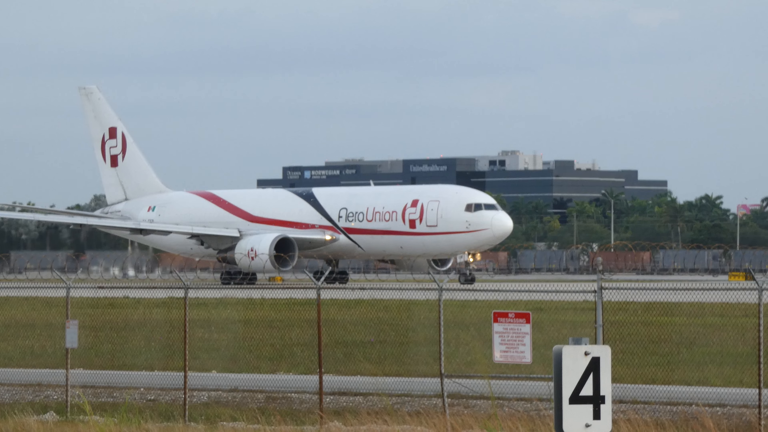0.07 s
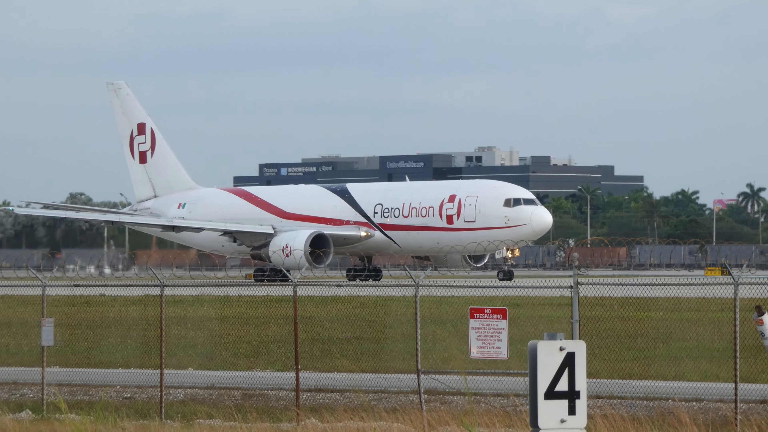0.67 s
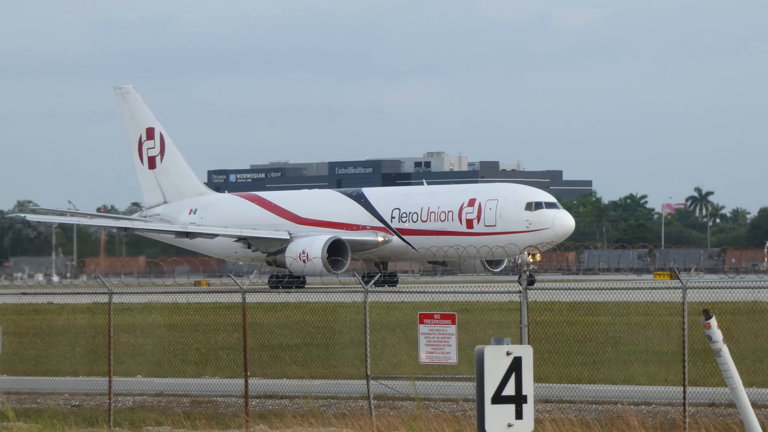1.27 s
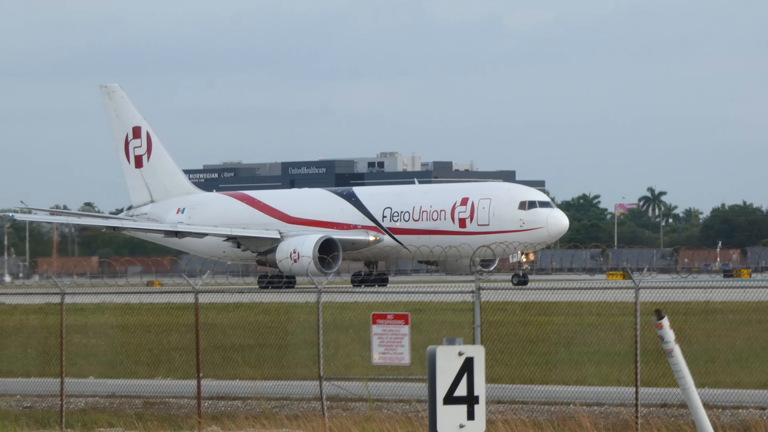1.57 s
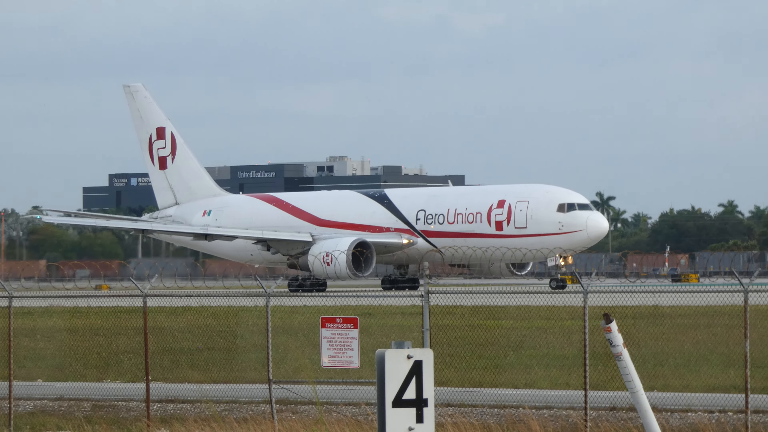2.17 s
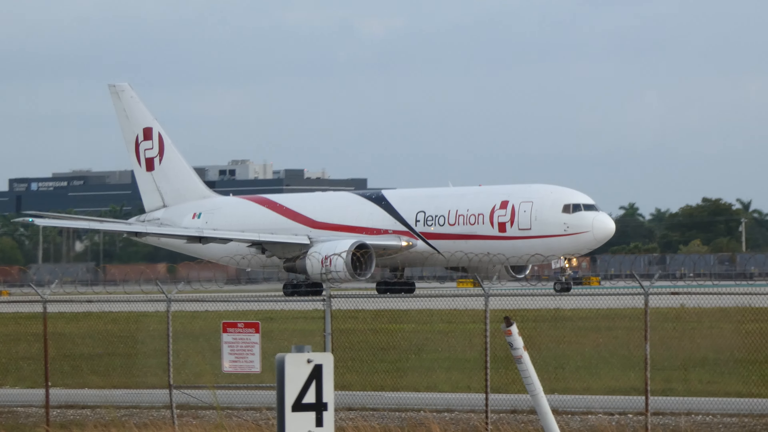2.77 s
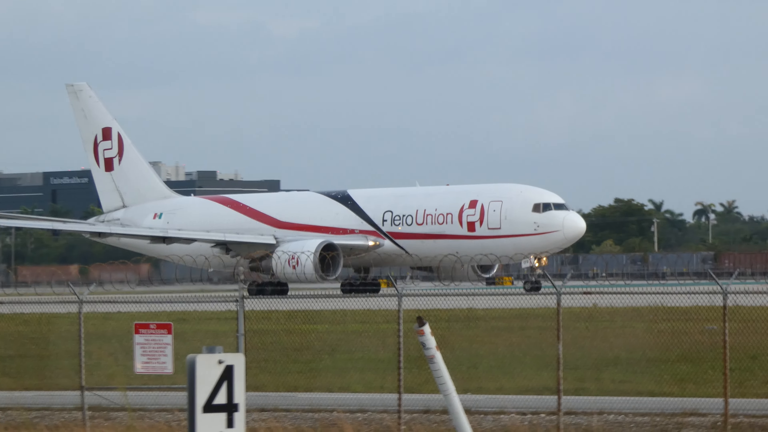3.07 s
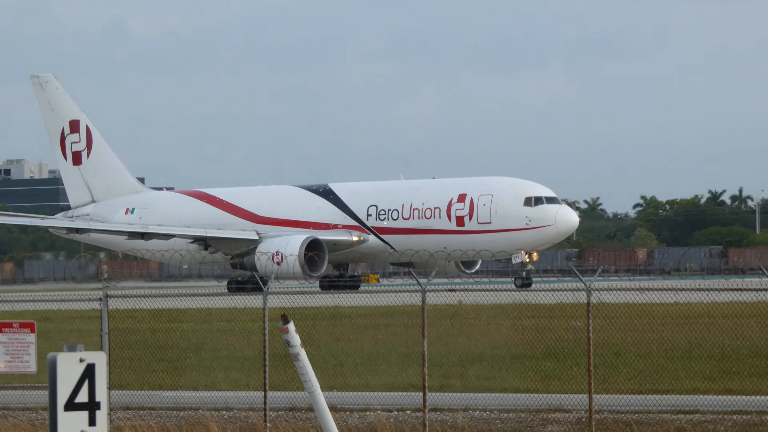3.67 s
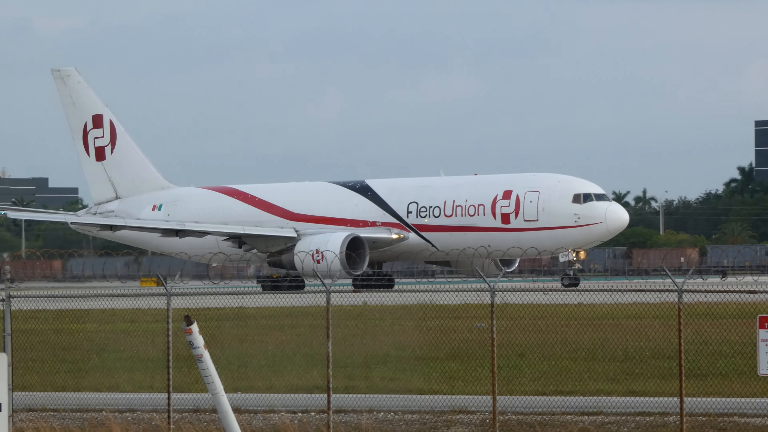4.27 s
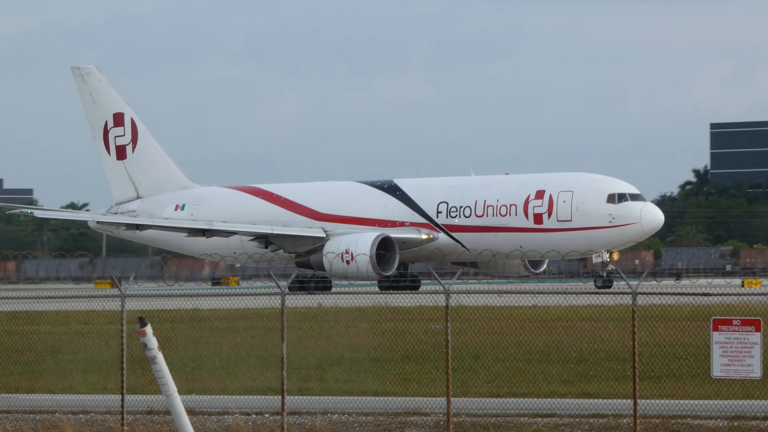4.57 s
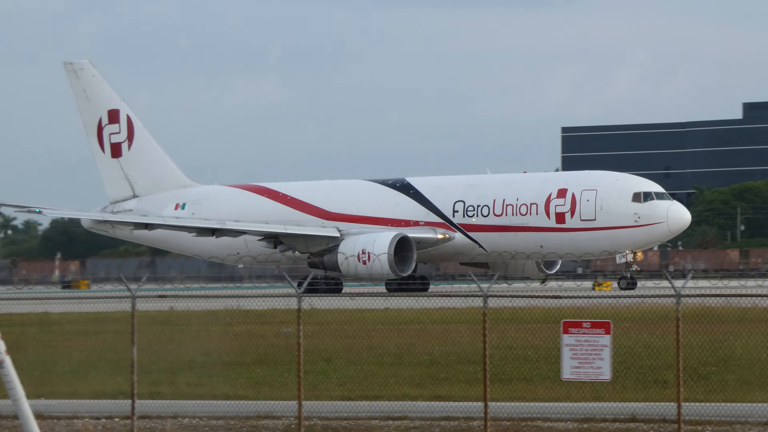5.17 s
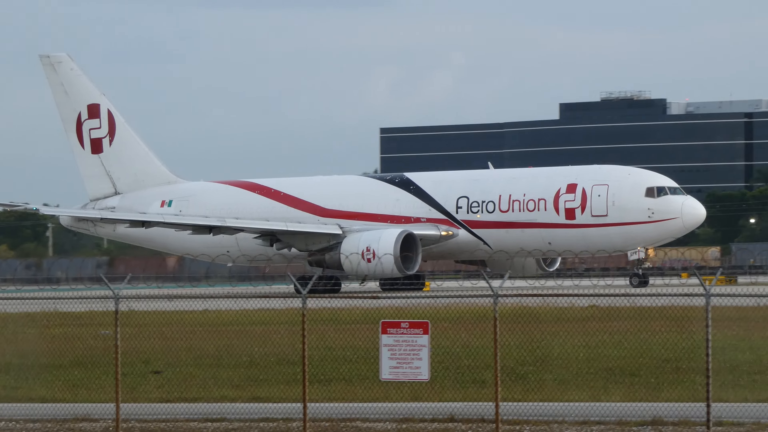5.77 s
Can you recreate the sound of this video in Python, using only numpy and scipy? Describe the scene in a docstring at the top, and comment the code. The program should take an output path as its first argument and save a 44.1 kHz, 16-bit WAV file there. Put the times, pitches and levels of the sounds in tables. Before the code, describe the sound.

Outdoors, some distance from a runway, an airliner's two jet engines spool up with a piercing, rising whine and a broad rush of air. The pitch gradually settles at full power while a rough buzz comes in and a deep rumble builds underneath. The engine tones beat against each other, swelling and fading as they carry over the field, with a faint high whistle above.

```python
"""A rising fan whine over rushing air: a twin-engined jet airliner spools up and starts its take-off roll,
a few hundred metres away across an airfield. The two fans whine at blade rate and beat against each other.
Exhaust roar and rumble grow under the rush of the intakes and a faint turbine whistle. As the blade tips
go supersonic a buzz of shaft harmonics joins in. The moving air makes everything waver."""
import sys
import numpy as np
from scipy import signal
from scipy.fft import rfft, irfft
from scipy.io import wavfile
from scipy.ndimage import map_coordinates

SR = 44100
rng = np.random.default_rng(int(sys.argv[2]) if len(sys.argv) > 2 else 0)


def store_wav(level_fs):
    """Save 16-bit WAV to argv[1]."""
    pcm = np.round(np.clip(np.atleast_2d(level_fs), -1, 1) * 32767)
    wavfile.write(sys.argv[1], SR, pcm.T.astype(np.int16))


N = 265923
TIME_S = np.arange(N) / SR
FREQ_HZ = np.fft.rfftfreq(N, 1 / SR)
BLADES, FULL_SHAFT_HZ = 38, 52.47


def undb(db):
    """Decibels to gain."""
    return 10 ** (np.asarray(db) / 20)


def curves(table):
    """Columns of a timed table, one value a sample."""
    time_s, *columns = np.transpose(table)
    return [np.interp(TIME_S, time_s, column) for column in columns]


def at_pitch(table, hz):
    """Interpolate a spectrum on a log frequency axis."""
    freq_hz, level_db = np.transpose(table)
    return np.interp(np.log(np.maximum(hz, 1)), np.log(freq_hz), level_db)


def walk(rate_hz):
    """Smooth random drift of unit spread."""
    drift = signal.resample_poly(rng.standard_normal(2048), 8, 1)
    return np.interp(TIME_S * rate_hz * 8, np.arange(len(drift)), drift)


def tone(cycles, waver_db, waver_hz, smear_rad):
    """Sine of rms near one; eddies on its path shake level and phase."""
    phase = 2 * np.pi * (cycles + rng.random()) + smear_rad * walk(waver_hz)
    return np.sqrt(2) * np.sin(phase) * undb(waver_db * walk(waver_hz))


def turbulence(spectrum, flicker_db, flicker_hz):
    """Coloured noise of unit rms whose octaves flicker separately."""
    coloured = rfft(rng.standard_normal(N)) * undb(at_pitch(spectrum, FREQ_HZ))
    octave = np.log2(np.clip(FREQ_HZ, spectrum[0][0], spectrum[-1][0]))
    out = 0
    for centre in range(int(octave[0]), int(octave[-1]) + 2):
        band = irfft(coloured * np.maximum(1 - np.abs(octave - centre), 0), N)
        out = out + band * undb(flicker_db * walk(flicker_hz))
    return out / np.sqrt(np.mean(out ** 2))


def shaft_hz():
    """Spool-up: a steady climb hands over softly to an exponential settling on take-off speed."""
    climb_hz = 39.9 + 9.05 * TIME_S
    settle_hz = FULL_SHAFT_HZ - 8.04 * np.exp(-TIME_S / 1.31)
    handover_hz = 0.745
    return -handover_hz * np.logaddexp(-climb_hz / handover_hz, -settle_hz / handover_hz)


# Treble swell in moving air: time_s, level_db
TREBLE_SWELL = [(0.06, 2), (0.17, -0.5), (0.33, 0.5), (0.68, 2), (1.0, 3.5), (1.17, 3), (1.62, 4.5),
                (1.8, 4), (1.93, 2.5), (2.29, 4.5), (2.39, 2.6), (2.6, 2.5), (2.82, 2.5), (3.17, -1),
                (3.4, 0.7), (3.62, 1), (3.79, -0.5), (3.99, 1.9), (4.2, 1.6), (4.5, 3), (4.65, 0.5),
                (4.82, 3), (5.0, 1), (5.18, 3.5), (5.33, 3.5), (5.5, 2.6), (5.65, 2), (5.88, 1.5),
                (6.03, 2.5)]
# Level laws by layer: full_speed_db, db_per_shaft_hz, db_per_s, swell_share
LEVEL_LAWS = { "roar": (-32.5, 0.9, 1.1, 0.17), "rush": (-24.5, 1.1, -1.21, 0.86),
              "rasp": (-39.5, 1.3, 0.54, 1.32), "hiss": (-33, 0.37, -0.06, 1.51),
              "whistle": (-54.5, -0.25, -0.57, 3), "third": (-48.5, 0.15, -1.4, 1.5),
              "fourth": (-67, -1.0, -0.5, 1.5), }

def layer_gain(layer):
    """Gain from fan speed, progress along the runway and treble swell."""
    full_speed_db, db_per_shaft_hz, db_per_s, swell_share = LEVEL_LAWS[layer]
    speed_db = full_speed_db + db_per_shaft_hz * (shaft_hz() - FULL_SHAFT_HZ)
    return undb(speed_db + db_per_s * TIME_S + swell_share * curves(TREBLE_SWELL)[0])


# Intake beam lobes: centre_s, shaft_order, half_width_s, peak_db
BEAM_LOBES = [(.48, 152, .2, -50), (.65, 114, .2, -44), (1.02, 114, .1, -43), (1.14, 34, .12, -29),
              (1.15, 35, .15, -27.5), (1.2, 36, .2, -32), (1.25, 85, .15, -46), (1.32, 114, .1, -45),
              (1.45, 47, .3, -39.5), (1.52, 35, .14, -33), (1.55, 34, .16, -32), (1.97, 29, .18, -26.5),
              (2.2, 47, .15, -38), (2.68, 34, .14, -33), (2.8, 47, .15, -39), (2.8, 54, .15, -41),
              (4.3, 47, .2, -40), (4.42, 29, .13, -34), (5.2, 29, .2, -33), (5.25, 47, .3, -39),
              (5.4, 41, .2, -37), (5.3, 54, .2, -40), (5.42, 55, .18, -39.5), (5.35, 52, .3, -39.5)]

def flare(order):
    """Gain of one shaft harmonic as lobes of the intake's beam sweep past the listener."""
    return sum(undb(peak_db) * np.exp(-((TIME_S - centre_s) / half_width_s) ** 2)
               for centre_s, shaft_order, half_width_s, peak_db in BEAM_LOBES if shaft_order == order)


def shock_flutter():
    """Rough gain on the blade tone while the first shocks come and go at the tips."""
    depth = 0.18 * np.exp(-((TIME_S - 1.25) / 0.25) ** 2)
    return (1 + depth * walk(rate_hz=260)) / np.sqrt(1 + depth ** 2)


# Blade tone as it carries over the field: time_s, level_db
BLADE_LEVEL = [(0.06, -26), (0.2, -23.5), (0.29, -18.5), (0.335, -18), (0.355, -24), (0.375, -19),
               (0.5, -17), (0.585, -26), (0.64, -16.5), (0.7, -22.5), (0.79, -22.5), (0.9, -20.5),
               (1.08, -25), (1.3, -23), (1.52, -33.5), (1.84, -26.5), (2.02, -31), (2.2, -24), (2.38, -31),
               (2.62, -23), (2.73, -32), (2.87, -25), (3.13, -24.5), (3.25, -34.5), (3.44, -29),
               (3.55, -38.5), (3.65, -28.5), (3.78, -26.5), (3.88, -31.5), (4.2, -34), (4.36, -34),
               (4.49, -23), (4.56, -33.5), (4.63, -27), (4.76, -29), (4.88, -28.5), (5.15, -31.5),
               (5.35, -34.5), (5.64, -24.5), (5.81, -30), (5.89, -26.5), (6.03, -28.5)]
# Its octave: time_s, level_db
OCTAVE_LEVEL = [(0.06, -45.5), (0.2, -49), (0.42, -37.5), (0.58, -44), (0.67, -40), (0.77, -46),
                (0.87, -33.5), (0.95, -38), (1.21, -30.5), (1.36, -38.5), (1.7, -40.5), (1.87, -35),
                (2.02, -40.5), (2.13, -35), (2.25, -42.5), (2.4, -37.5), (2.52, -54.5), (2.9, -39),
                (3.15, -48.5), (3.3, -43), (3.7, -46), (4.1, -40), (4.25, -36.5), (4.36, -47), (4.7, -45),
                (5.08, -39.5), (5.38, -45.5), (5.53, -36.5), (5.65, -50), (6.03, -47)]
# Higher overtones: layer, blade_multiple, waver_db, waver_hz, smear_rad
BLADE_OVERTONES = [("third", 3, 3.5, 85, 1.3), ("fourth", 4, 2.8, 80, 1.3)]

def fan_whine(turns):
    """Blade-passing tone of one fan; its overtones scatter more in the air and fade in and out."""
    passes = BLADES * turns + 0.064 * walk(rate_hz=9.8)  # slow eddies vary the path length
    fundamental = tone(passes, waver_db=1.3, waver_hz=70, smear_rad=0.3) * shock_flutter()
    octave = tone(2 * passes, waver_db=2.6, waver_hz=70, smear_rad=0.8)
    out = undb(curves(BLADE_LEVEL)[0] + 0.66) * fundamental
    out += undb(curves(OCTAVE_LEVEL)[0] + 0.5) * octave
    for layer, multiple, waver_db, waver_hz, smear_rad in BLADE_OVERTONES:
        gain = np.hypot(layer_gain(layer), flare(multiple * BLADES))
        out += gain * tone(multiple * passes, waver_db, waver_hz, smear_rad)
    return out


# Spectral dips: centre_hz, half_width_hz, gain_db
DIPS = [(864, 43, 0.5), (2446, 100, -3), (3280, 170, -4.5), (4600, 81, -7)]

def hollow(x):
    """Steady dips give the airflow a hollow, ringing colour."""
    shape_db = sum(gain_db * np.exp(-((FREQ_HZ - centre_hz) / half_width_hz) ** 2)
                   for centre_hz, half_width_hz, gain_db in DIPS)
    return irfft(rfft(x) * undb(shape_db), N)


def follow_shaft(x, share):
    """Raise the pitch of a noise by a share of the fan's rise in speed."""
    pace = (shaft_hz() / FULL_SHAFT_HZ) ** share
    return map_coordinates(x, [np.cumsum(pace)], mode="mirror")


# Intake spectra at full speed: freq_hz, density_db
RUSH_SPECTRUM = [(200, -56), (500, -14), (840, -24), (980, -9.5), (1250, -2.5), (1600, 1.5), (1850, -5),
                 (2150, -5), (2500, -11.5), (3400, -22), (5000, -53), (10000, -80)]
RASP_SPECTRUM = [(600, -59), (1900, -7), (2250, 3), (2500, 3.5), (2750, 2), (2950, 2.5), (3250, -2.5),
                 (4000, -41), (10000, -70.5)]
HISS_SPECTRUM = [(300, -43), (1500, 10), (2500, -1.5), (3300, 3.5), (3800, -1), (4250, 3), (4520, -1.5),
                 (4800, -2), (5800, -2), (7000, -6), (8100, -13.5), (9500, -18.5), (11000, -31),
                 (12300, -54)]

def intake():
    """Air drawn through the fans: rush and rasp climb with the shaft, hiss holds its pitch."""
    rush = follow_shaft(turbulence(RUSH_SPECTRUM, flicker_db=1.0, flicker_hz=19), share=0.25)
    rasp = follow_shaft(turbulence(RASP_SPECTRUM, flicker_db=1.5, flicker_hz=26), share=0.5)
    hiss = turbulence(HISS_SPECTRUM, flicker_db=0.57, flicker_hz=20)
    return hollow(layer_gain("rush") * rush + layer_gain("rasp") * rasp + layer_gain("hiss") * hiss)


# Turbine band: freq_hz, density_db
WHISTLE_SPECTRUM = [(4500, -39), (4700, -6), (4790, 0), (4890, -4), (5100, -40)]

def turbine_whistle():
    """Faint narrow-band whistle of a turbine stage, steady in pitch."""
    return layer_gain("whistle") * turbulence(WHISTLE_SPECTRUM, flicker_db=2.5, flicker_hz=9)


# Exhaust spectra: freq_hz, density_db
RUMBLE_SPECTRUM = [(20, -61), (30, -44), (50, -14.5), (75, -5.5), (102, 0), (135, -5), (180, -13),
                   (250, -22), (500, -61.5)]
ROAR_SPECTRUM = [(50, -50.5), (150, -24.5), (260, -17.5), (390, -13.5), (500, -9.5), (630, -1.5), (820, -4),
                 (1050, 1.5), (1600, -16), (3000, -52.5), (8000, -68)]
# Rumble growth: time_s, level_db
RUMBLE_LEVEL = [(0.4, -55), (1.0, -46.5), (2.6, -42.5), (3.7, -40), (4.75, -39.5), (5.1, -39.5),
                (6.03, -41)]

def exhaust():
    """The turbulent jets rumble and roar, louder as the engines spool up."""
    rumble = turbulence(RUMBLE_SPECTRUM, flicker_db=1.86, flicker_hz=7.5)
    roar = turbulence(ROAR_SPECTRUM, flicker_db=1.5, flicker_hz=8.6)
    return undb(curves(RUMBLE_LEVEL)[0] + 2.1) * rumble + hollow(layer_gain("roar") * roar)


# Chief shaft harmonics: shaft_order, level_db
CHIEF_HARMONICS = [(9, -42.5), (11, -45.5), (12, -44), (15, -44), (17, -40), (18, -38.5), (19, -36.5),
                   (20, -36), (22, -35.5), (23, -38), (25, -41.5), (26, -38), (27, -38), (29, -39.5),
                   (34, -40.5), (40, -39.5), (41, -39), (47, -41.5), (52, -47), (54, -46), (55, -48)]
# Envelope of the other harmonics: full_speed_pitch_hz, level_db
OTHER_HARMONICS = [(400, -56), (800, -46), (1300, -45), (1600, -43), (1850, -42.5), (1950, -50),
                   (2200, -44.5), (2550, -50.5), (2850, -48.5), (3300, -57), (3900, -53), (4500, -58),
                   (5200, -60)]
# Buzz onset, low orders last: shaft_order, trim_db, half_gain_shortfall_hz
BUZZ_ONSET = [(9, -2.1, 1.16), (19, -3, 2.8), (34.2, -0.25, 4.7)]

def shock_buzz(turns, orders, waver_db, waver_hz):
    """Supersonic tips carry unequal shocks, so shaft harmonics sound; eddies blur the high ones most."""
    chief_db = dict(CHIEF_HARMONICS)
    shortfall_hz = FULL_SHAFT_HZ - shaft_hz()
    onset_orders, trim_db, half_gain_hz = np.transpose(BUZZ_ONSET)
    out = np.zeros(N)
    for order in orders:
        level_db = chief_db.get(order, at_pitch(OTHER_HARMONICS, order * FULL_SHAFT_HZ))
        level_db += np.interp(order, onset_orders, trim_db)
        growth = 1 / (1 + (shortfall_hz / np.interp(order, onset_orders, half_gain_hz)) ** 2)
        gain = np.hypot(undb(level_db) * growth, flare(order))
        out += gain * tone(order * turns, waver_db, waver_hz, smear_rad=0.28 * order / BLADES)
    return out


# Near fan hunting around take-off speed: time_s, shaft_offset_hz
NEAR_FAN = [(3.4, 0), (4.2, -.07), (4.6, .07), (5.0, .09), (5.4, -.07), (6.03, 0)]
# Far fan relative to the near one: time_s, slip_hz, level_db
FAR_FAN = [(0.06, 1.0, -13), (0.3, 0.7, -17), (0.47, 0.55, -16), (0.6, -0.1, -8), (0.75, -0.5, -4.5),
           (0.88, -0.76, -2.5), (1.05, -0.82, -1), (1.22, -0.77, -3), (1.5, -0.8, -8), (2, -0.4, -9),
           (3.1, -0.12, -13), (4, 0.2, -11), (4.7, 0.24, -8), (5, -0.38, -5), (5.5, -0.15, -8),
           (6.03, 0.3, -8)]

def twin_fans():
    """Whine and buzz of two fans that beat at nearly equal speed; the fuselage partly hides the far one."""
    slip_hz, far_db = curves(FAR_FAN)
    near_turns = np.cumsum(shaft_hz() + curves(NEAR_FAN)[0]) / SR
    far_turns = near_turns + np.cumsum(slip_hz) / SR
    far_gain = undb(far_db)
    whine = (fan_whine(near_turns) + far_gain * fan_whine(far_turns)) / np.sqrt(1 + far_gain ** 2)
    near_orders = [order for order in range(8, 100) if order % BLADES]
    far_orders = [order for order, _ in CHIEF_HARMONICS]
    near_buzz = shock_buzz(near_turns, near_orders, waver_db=2.7, waver_hz=5)
    far_buzz = shock_buzz(far_turns, far_orders, waver_db=3, waver_hz=4)
    far_onset = np.interp(shaft_hz(), [50.5, FULL_SHAFT_HZ], [0, 1])
    return whine, near_buzz + far_onset * undb(far_db - 1.5) * far_buzz


# Top range, carried in soft gusts: time_s, gain_db
TOP_GAIN = [(0.06, -6), (0.65, -2.5), (0.95, 1), (1.25, -3.5), (1.62, -2.5), (2.2, -1.7), (2.7, -4.5),
            (3.3, -1.5), (3.55, 1.5), (4.4, 0.2), (4.9, -1.5), (5.2, 0.7), (6.03, -0.5)]

def air_absorption(x, edge_hz):
    """Air swallows the top range unevenly, and less as the aircraft nears."""
    highpass = 1 - 1 / (1 + (FREQ_HZ / edge_hz) ** 8)
    treble = irfft(rfft(x) * highpass, N)
    return x + treble * (undb(curves(TOP_GAIN)[0]) - 1)


# Stereo balance: freq_hz, left_minus_right_db
BALANCE = [(60, -2.5), (125, -1), (280, 2), (600, 1.7), (1100, 0.5), (1700, -3), (2200, 1.5), (4000, 0.5),
           (8000, 0)]
# Diffuse side share: freq_hz, level_db
SIDE_SHARE = [(30, -8.5), (70, -19), (250, -10), (600, -15.5), (1500, -16), (2500, -13), (5000, -13.5),
              (9000, -11.5)]

def stereo_scatter(x, decay_s):
    """Direct sound reaches both sides together; scatter from ground and buildings differs between them."""
    lag_s = TIME_S[:SR // 4]
    scatter = rfft(rng.standard_normal(len(lag_s)) * np.exp(-lag_s / decay_s), N)
    direct = rfft(x)
    side = direct * np.exp(1j * np.angle(scatter)) * undb(at_pitch(SIDE_SHARE, FREQ_HZ))
    lean = undb(at_pitch(BALANCE, FREQ_HZ) / 2)
    return np.array([irfft(direct * lean + side, N), irfft(direct / lean - side, N)])


def scene():
    """The aircraft heard through gusty air, which shakes the upper range most."""
    whine, buzz = twin_fans()
    jets = exhaust()
    upper = buzz + intake() + turbine_whistle()
    shimmer = undb(0.63 * walk(rate_hz=17))
    aircraft = whine + jets + upper * shimmer
    return stereo_scatter(air_absorption(aircraft, edge_hz=6400), decay_s=0.041)


def record(dry):
    """The sound opens quickly and a little loud, then settles; the top is cut."""
    start_s, rise_s, boost_db, settle_s, cutoff_hz = 0.054, 0.018, 9.5, 0.23, 11900
    age_s = np.maximum(TIME_S - start_s, 0)
    opening = np.minimum(age_s / rise_s, 1) * undb(boost_db * np.exp(-age_s / settle_s))
    lowpass = signal.ellip(8, 0.2, 70, cutoff_hz, fs=SR, output="sos")
    return signal.sosfilt(lowpass, dry * opening)


dry = scene()
out = record(dry)
store_wav(out)
```